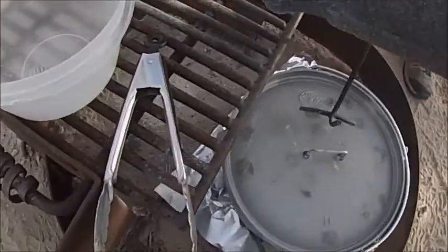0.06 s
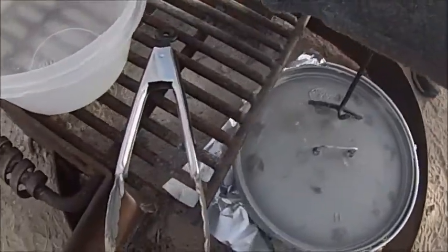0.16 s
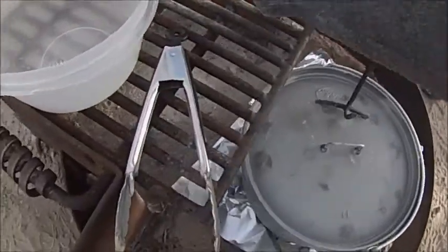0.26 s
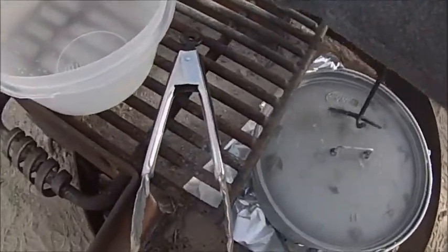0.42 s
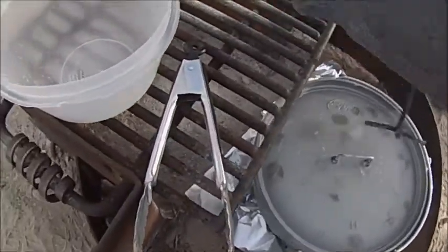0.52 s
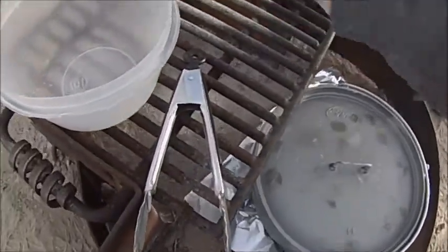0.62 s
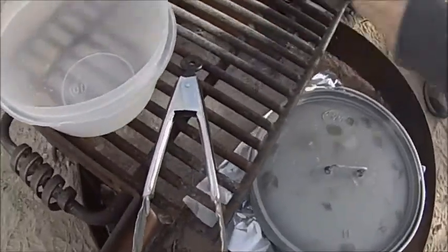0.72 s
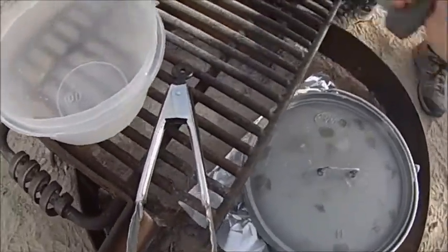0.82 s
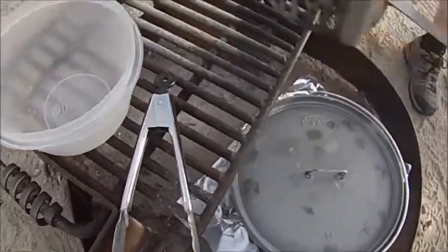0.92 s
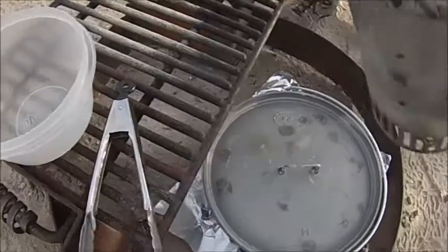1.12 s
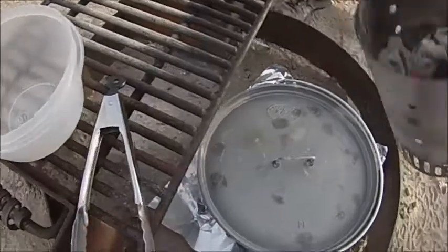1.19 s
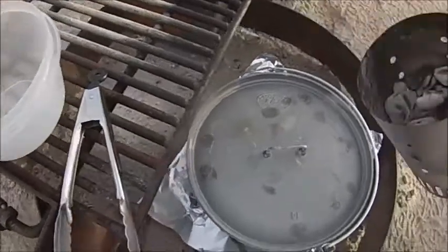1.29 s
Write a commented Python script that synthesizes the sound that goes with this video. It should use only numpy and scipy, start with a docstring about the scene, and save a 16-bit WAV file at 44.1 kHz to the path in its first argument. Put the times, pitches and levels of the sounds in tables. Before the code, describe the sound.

One loud clank sounds close by as an iron lid is set on a pot outdoors, its ringing quickly stopped. The lifting hook faintly scrapes, squeaks and knocks loose, leaving soft bumps, tiny ticks and a low background rumble.

```python
"""One loud, short clank: an iron pot lid is set down with a hook, close by, next to a fire pit.
The lid's rim rattles as it lands, and its seat quickly stops the ringing. The hook scrapes under
the handle, squeaks, slips free with a light knock and rings on faintly. Dull bumps, tiny crunches
and ticks are dotted over a quiet outdoor rumble."""
import sys
import numpy as np
from scipy import signal
from scipy.fft import rfft, irfft, next_fast_len
from scipy.io import wavfile
from scipy.ndimage import uniform_filter1d

SR = 44100
rng = np.random.default_rng(int(sys.argv[2]) if len(sys.argv) > 2 else 0)


def store_wav(level_fs):
    """Save 16-bit WAV to argv[1]."""
    pcm = np.round(np.clip(np.atleast_2d(level_fs), -1, 1) * 32767)
    wavfile.write(sys.argv[1], SR, pcm.T.astype(np.int16))


N = 59535
T = np.arange(N) / SR

# The hook's ringing tones: pitch_hz, level_db, ring_s (the time to fade by 60 dB)
HOOK_TONES = [(498.4, -46, 0.77), (546, -45, 0.3), (600, -51, 0.64), (724, -62, 0.21), (859, -61.5, 0.55),
              (853, -65, 0.59), (995, -61, 1.47), (6510, -58, 0.21)]
# Tone colour of the rim's clash and of the crunches: pitch_hz, level_db
CLASH_COLOUR = [(300, -12.5), (1000, 5), (1450, -6), (1900, 1.5), (2800, 7.5), (3800, -3), (5000, -0.5),
                (6400, -1.5), (8000, -17.5), (9200, -6.5), (11700, -18.5), (12500, -16.5), (15500, -39.5)]


def lid_clank():
    """Each blow makes the lid ring low, while its rattling rim adds a bright clash and high tones."""
    # The landing, then the light knock: start_s, level_db, bright_db (compared with the blow)
    blows = [(0.1998, 2, -2), (0.459, -29, 2.5)]
    # The lid's low tones, cut short by its seat: pitch_hz, level_db, ring_s
    low_tones = [(193.8, -6.5, 0.069), (228, -13, .04), (279, -30.5, 0.1), (404, -40.5, .08),
                 (639, -9.5, 0.063), (730, -14.5, .055), (926, -16.5, 0.051), (943, -18, 0.13),
                 (1359, -35, .065), (1851, -27, 0.041)]
    # High tones of iron hitting iron: pitch_hz, level_db (before clang_db), ring_s
    high_tones = [(1620, -9, .065), (2128, -2, .11), (2350, -2, .135), (2395, -9, .14), (2580, -6, .09),
                  (2992, 0, .12), (3335, 0, .06), (4160, -8, .12), (4542, -2, .07), (4808, -3, .08),
                  (4988, -3, .085), (5600, -1, .065), (5968, -5, .08), (6449, -6, .13), (7795, -1, .065),
                  (9930, -14, .075), (11500, -14, .06)]
    # The rim's bounces after a blow: delay_s, level_db
    bounces = [(.0008, -2.5), (.0045, 3), (.0082, 1.5)]
    clash_db, snap_db, clang_db = -36, -34, -36
    low_cut_hz = 185  # the lid gives off little deep bass
    out = np.zeros(N)
    for start, level_db, bright_db in blows:
        rattle_power = np.zeros(N)
        for delay, bounce_db in bounces:
            clash = undb(clash_db + bounce_db) * fade(start + delay, attack_s=0, ring_s=0.084)
            snap = undb(snap_db + bounce_db) * fade(start + delay, attack_s=0, ring_s=0.014)
            rattle_power += clash ** 2 + snap ** 2
        clang = undb(clang_db) * ring(high_tones, start, attack_s=0.0042, scatter=0.82)
        rattle = np.sqrt(rattle_power) * colour(rng.standard_normal(N), CLASH_COLOUR)
        body = ring(low_tones, start, attack_s=0.0046)
        out += undb(level_db) * (body + undb(bright_db) * (rattle + clang))
    return signal.sosfilt(signal.butter(2, low_cut_hz, "high", fs=SR, output="sos"), out)


def hook_scrape():
    """The hook drags over rough iron: tiny slips hiss and set the hook itself ringing."""
    # Each drag, loudest at its hardest push: peak_s, rise_s, fall_s, level_db
    drags = [(.285, 0.046, 0.041, -56.5), (0.326, 0.031, 0.022, -50.5), (0.399, 0.031, 0.041, -53),
             (0.457, 0.0076, 0.022, -41), (0.506, .02, 0.049, -57)]
    # Tone colour of the scrape: pitch_hz, level_db
    scrape_colour = [(100, -6.5), (200, 5), (400, 10), (750, 17.5), (1050, 9.5), (1350, -7), (1750, 3.5),
                     (2500, 2.5), (3600, -0.5), (5000, -1), (6600, -3), (8000, -8.5), (12500, -16.5),
                     (15500, -27.5)]
    ringing_db = -5.5
    pushes = [undb(db) * np.exp(np.minimum((T - peak) / rise, (peak - T) / fall))
              for peak, rise, fall, db in drags]
    push = np.sqrt(sum(one ** 2 for one in pushes))
    slips = unit(grit())
    ringing = resonate(push * slips, ring(HOOK_TONES, 0, attack_s=0.001))
    return push * colour(slips, scrape_colour) + undb(ringing_db) * ringing


def hook_squeak():
    """The hook sticks and slips under the handle, making a short, rough, rising squeak."""
    # The path of the squeak: time_s, pitch_hz, level_db
    path = [(0.366, 790, -55), (0.379, 828, -57), (0.386, 942, -49.5), (.403, 992, -41.5),
            (0.41, 997, -48.5), (0.423, 1070, -62)]
    times, hz, db = np.array(path).T
    roughness = 0.032
    pitch = np.interp(T, times, hz) * (1 + roughness * wander(rate_hz=470))
    loudness = undb(np.interp(T, times, db)) * (T > times[0]) * (T < times[-1])
    return loudness * np.sin(2 * np.pi * np.cumsum(pitch) / SR)


def hook_ring():
    """Once it slips free, the hook rings on faintly."""
    return ring(HOOK_TONES, start_s=0.463, attack_s=0.001)


def bumps():
    """Dull bumps, each one low tone that dies away fast."""
    # One bump a row: start_s, pitch_hz, level_db, ring_s
    knocks = [(.008, 103, -36, 0.055), (.062, 60, -37, 0.081), (0.282, 168.5, -31.5, .11),
              (0.327, 222, -22.5, 0.02), (0.4626, 175.4, -29.5, .06), (.608, 205, -34.5, 0.035),
              (0.747, 70.2, -39, 0.11), (0.803, 66, -37, 0.068), (0.92, 177, -42, 0.054),
              (1.213, 208, -39, 0.041)]
    return sum(ring([(hz, db, ring_s)], start, attack_s=0.0064) for start, hz, db, ring_s in knocks)


def crunches():
    """Faint crunches, each a short swell of gritty noise."""
    # One crunch a row: peak_s, level_db
    moments = [(.715, -71), (1.219, -70.5), (1.34, -69)]
    return swells(moments, width_s=0.014) * colour(grit(), CLASH_COLOUR)


def ticks():
    """Faint ticks, each a tiny burst of high, gritty noise."""
    # One tick a row: peak_s, level_db
    moments = [(.085, -73), (.152, -80), (.574, -73), (.699, -71.5), (.716, -72.5), (.748, -69),
               (.835, -74), (.972, -71.5), (1.069, -70.5), (1.231, -69), (1.335, -73.5)]
    # Tone colour of the ticks: pitch_hz, level_db
    tick_colour = [(3000, -31), (5300, -6), (5680, 9), (6200, -23), (7200, -23), (7600, 2), (8300, -2.5),
                   (9000, -13), (12000, -34.5)]
    return swells(moments, width_s=0.005) * colour(grit(), tick_colour)


def echo(sound):
    """The surroundings scatter a faint, short echo back."""
    # Tone colour of the echo: pitch_hz, level_db
    echo_colour = [(100, -8.5), (250, 6), (800, -20.5), (1500, 4.5), (5000, -4), (14000, -9.5)]
    echo_db = -26
    tail = colour(rng.standard_normal(N), echo_colour) * fade(0, attack_s=0.012, ring_s=0.4)
    return undb(echo_db) * resonate(sound, tail)


def outdoor_air():
    """A low rumble with a thin hiss, gently rising and falling."""
    # Tone colour of the air: pitch_hz, level_db
    air_colour = [(12, -34), (20, 0), (64, -5.5), (139, -13), (169, -9), (223, -10.5), (377, -18),
                  (409, -18.5), (511, -16), (1020, -26), (1590, -30.5), (5690, -35.5), (15000, -50)]
    level_db, swell_db = -58.5, 1.57
    loudness = undb(level_db + swell_db * wander(rate_hz=2.7))
    return loudness * colour(rng.standard_normal(N), air_colour)


def undb(db):
    """Turn decibels into a number to multiply by."""
    return 10 ** (np.asarray(db) / 20)


def unit(x):
    """Scale a signal to an average (rms) level of 1."""
    return x / np.sqrt(np.mean(x ** 2))


def colour(x, points):
    """Shape a sound's lows and highs along (pitch_hz, level_db) points, then scale it to level 1."""
    hz, db = np.array(points, float).T
    size = 2 * next_fast_len(N)
    freqs = np.maximum(np.arange(size // 2 + 1) * SR / size, 1)
    gain = undb(np.interp(np.log(freqs), np.log(hz), db))
    # Fold the filter forward in time, so nothing is heard before its cause.
    cepstrum = irfft(np.log(gain))
    cepstrum[1:size // 2] *= 2
    cepstrum[size // 2 + 1:] = 0
    return unit(irfft(rfft(x, size) * np.exp(rfft(cepstrum)))[:N])


def fade(start_s, attack_s, ring_s):
    """A loudness curve that rises smoothly and falls by 60 dB in ring_s."""
    age = np.maximum(T - start_s, 0)
    rise = np.sin(np.pi / 2 * np.minimum(age / max(attack_s, 1 / SR), 1)) ** 2
    return rise * np.exp(-np.log(1000) * age / ring_s)


def ring(tones, start_s, attack_s, scatter=0):
    """Fading tones struck together; scatter, from 0 to 1, puts their waves out of step."""
    out = np.zeros(N)
    for hz, db, ring_s in tones:
        cycles = hz * (T - start_s) + scatter * rng.random()
        out += undb(db) * fade(start_s, attack_s, ring_s) * np.sin(2 * np.pi * cycles)
    return out


def resonate(sound, tail):
    """Let every instant of a sound set off its own copy of a fading tail."""
    return signal.fftconvolve(sound, tail / np.sqrt(np.sum(tail ** 2)))[:N]


def wander(rate_hz):
    """A smooth random drift with a typical size of 1."""
    hold = int(SR / rate_hz)
    steps = np.repeat(rng.standard_normal(N // hold + 1), hold)
    return unit(uniform_filter1d(uniform_filter1d(steps, hold), hold)[:N])


def grit(clicks_per_s=7500, spread_db=0.5):
    """A dense stream of tiny clicks of uneven size."""
    clicks = (rng.random(N) < clicks_per_s / SR) * rng.standard_normal(N)
    return clicks * undb(spread_db * rng.standard_normal(N))


def swells(rows, width_s):
    """A loudness curve with a bell-shaped hump for each (peak_s, level_db) row."""
    return sum(undb(db) * np.exp(-0.5 * ((T - peak) / width_s) ** 2) for peak, db in rows)


def scene():
    """Mix the close sounds, their echo and the outdoor air into one channel."""
    close = lid_clank() + hook_scrape() + hook_squeak() + hook_ring() + bumps() + crunches() + ticks()
    return (close + echo(close) + outdoor_air())[None]


def record(dry):
    """The recorder cuts off the very highest treble."""
    top_hz = 14900
    return signal.sosfilt(signal.ellip(8, 0.2, 70, top_hz, fs=SR, output="sos"), dry)


dry = scene()
out = record(dry)
store_wav(out)
```